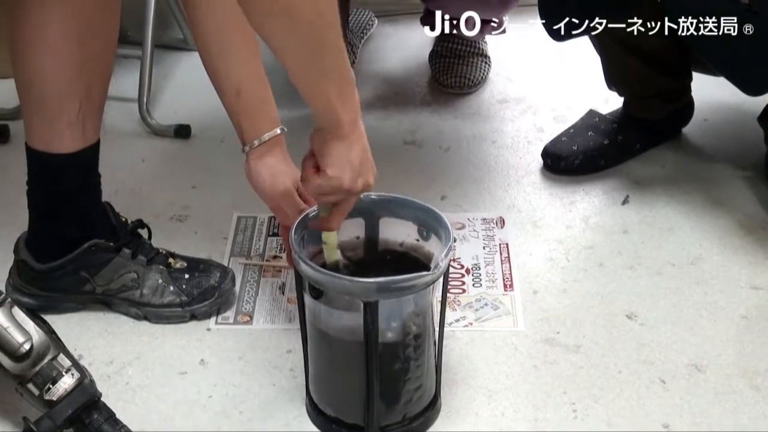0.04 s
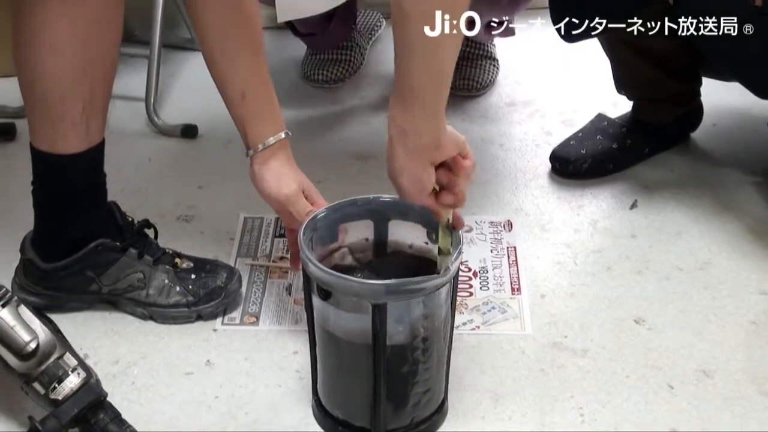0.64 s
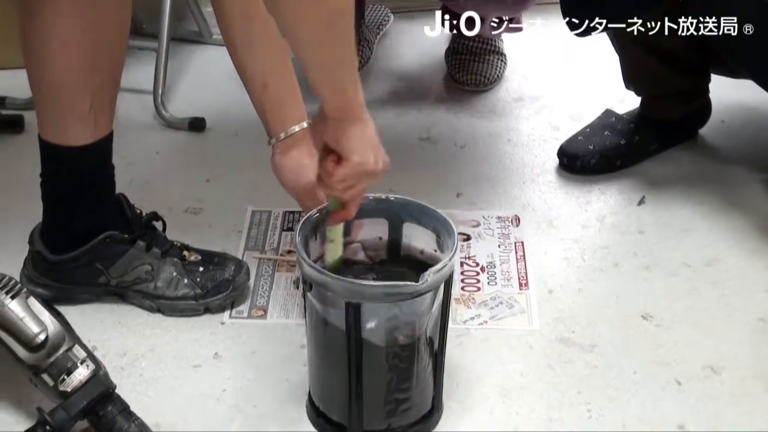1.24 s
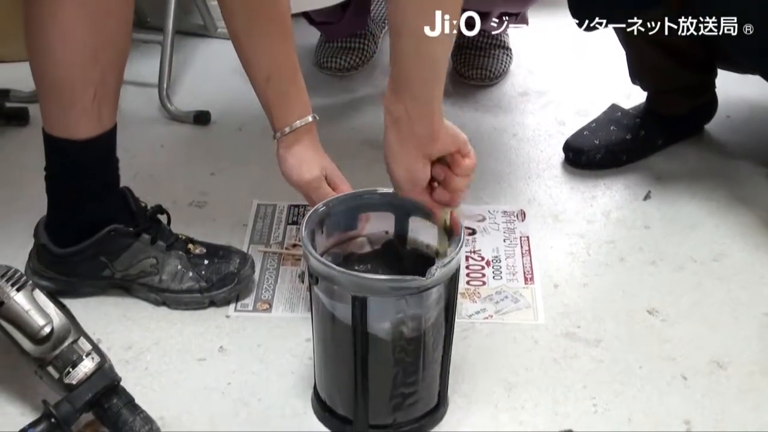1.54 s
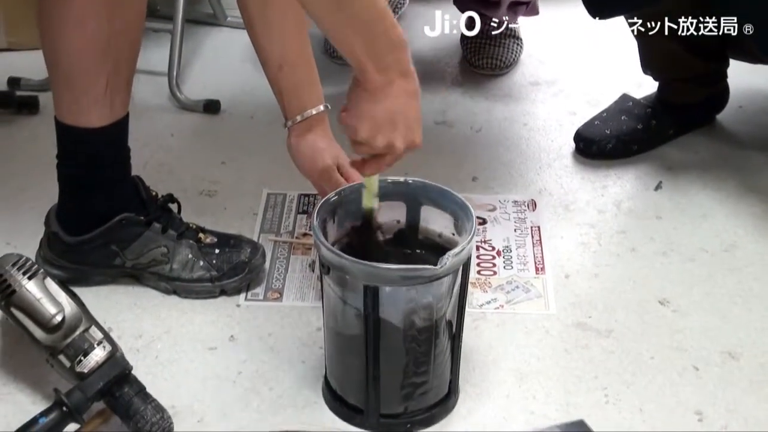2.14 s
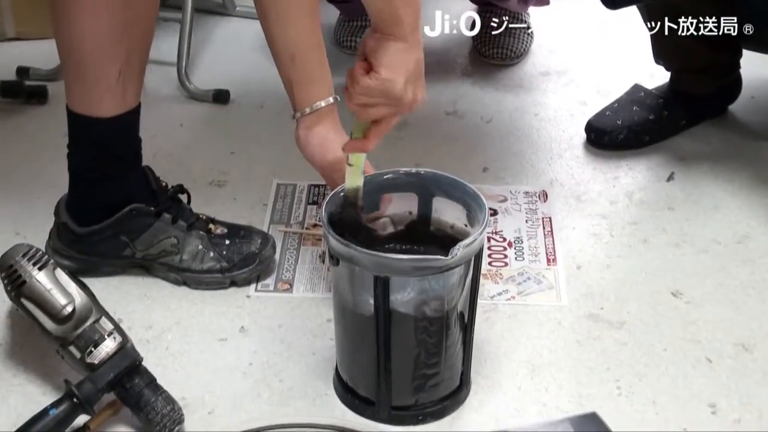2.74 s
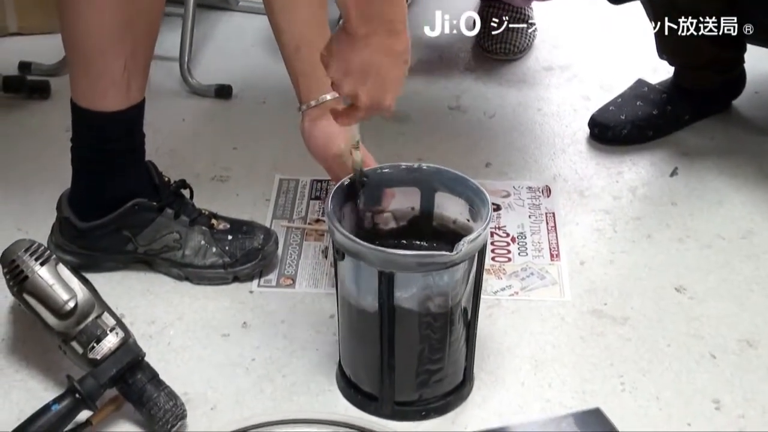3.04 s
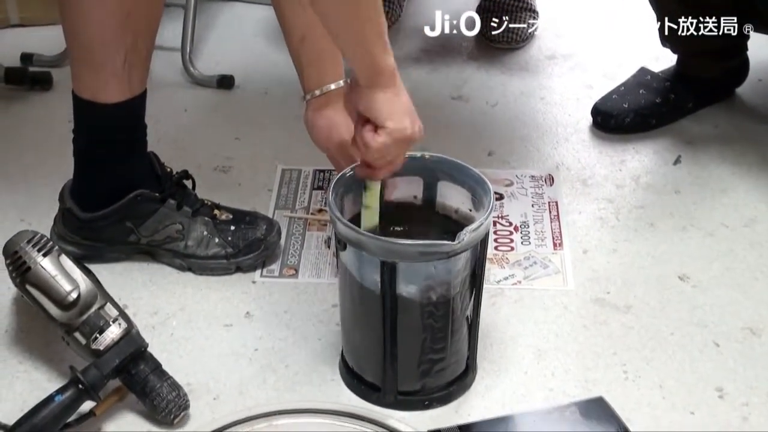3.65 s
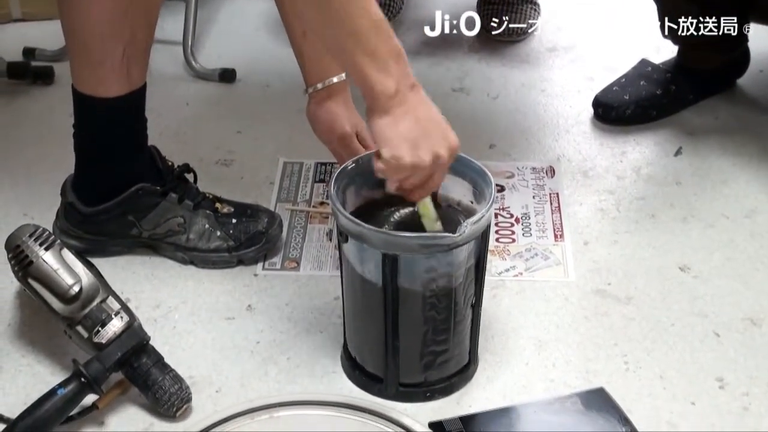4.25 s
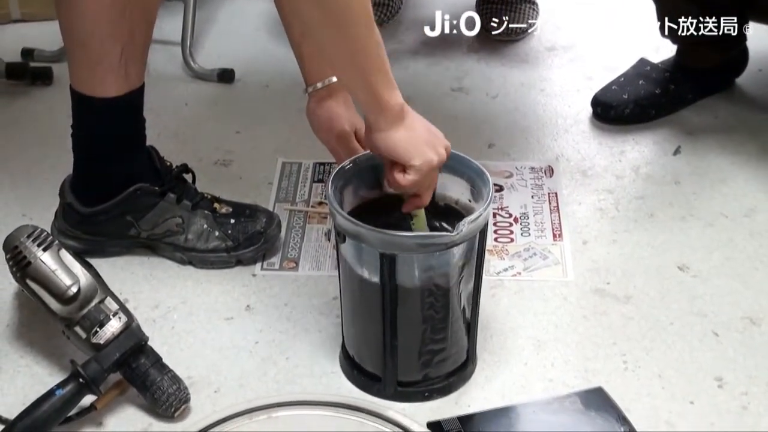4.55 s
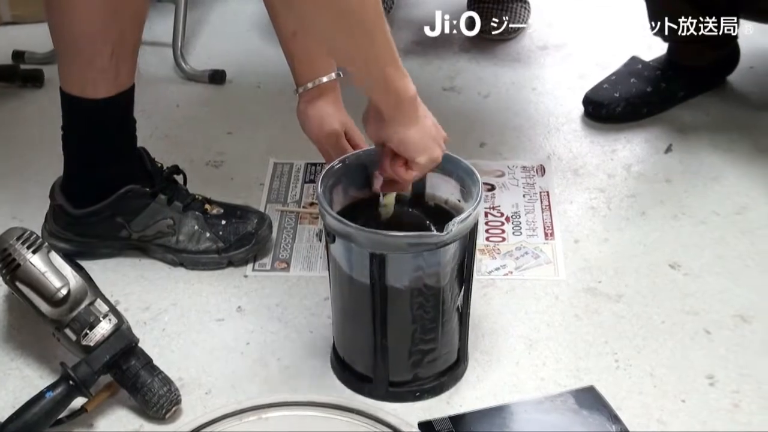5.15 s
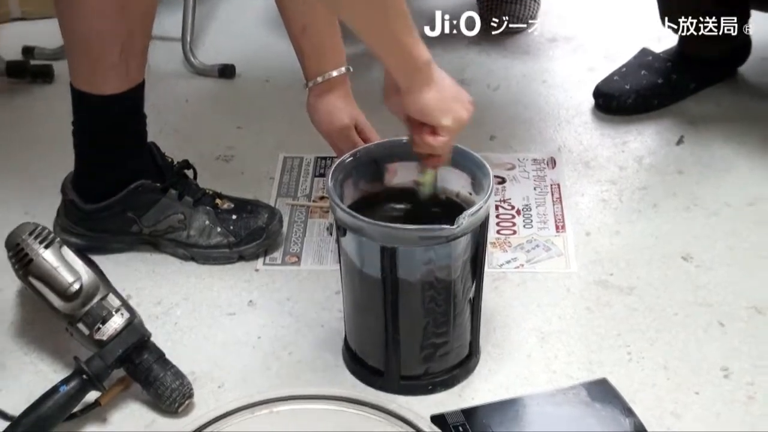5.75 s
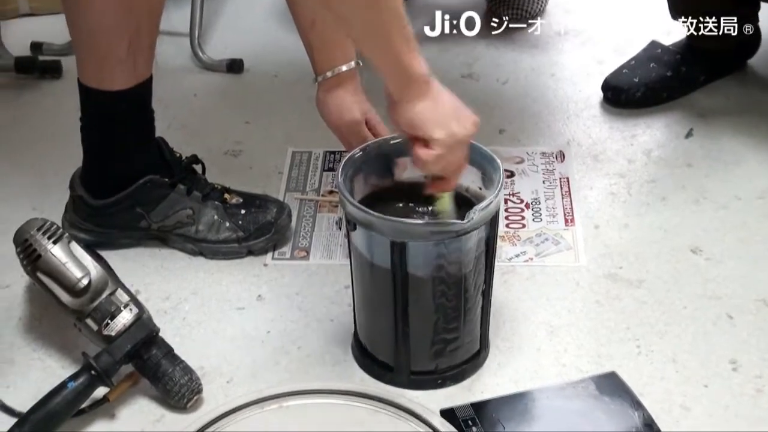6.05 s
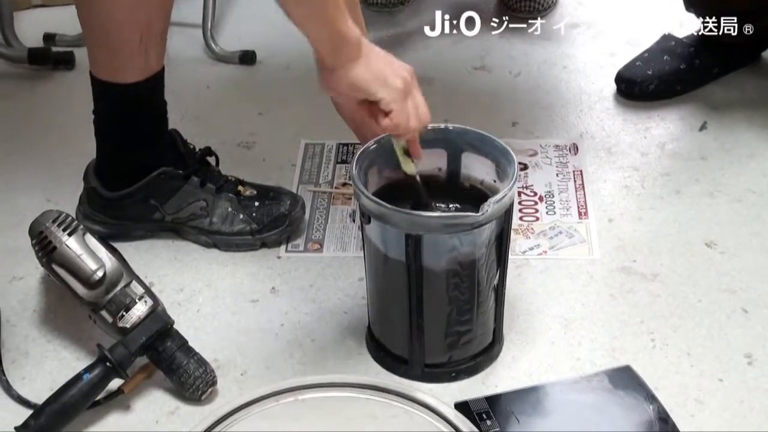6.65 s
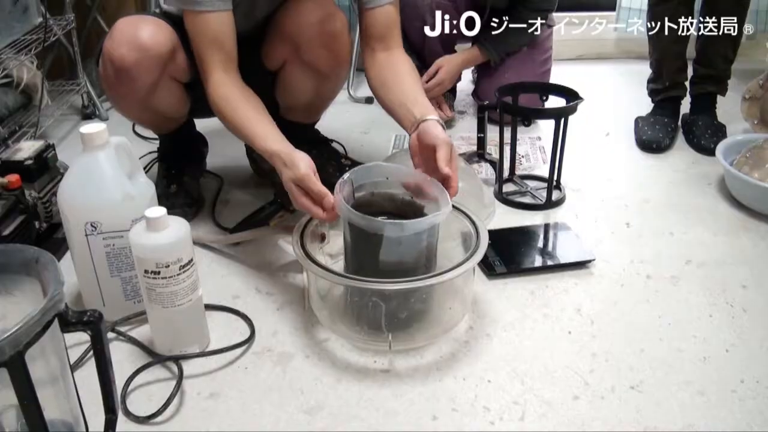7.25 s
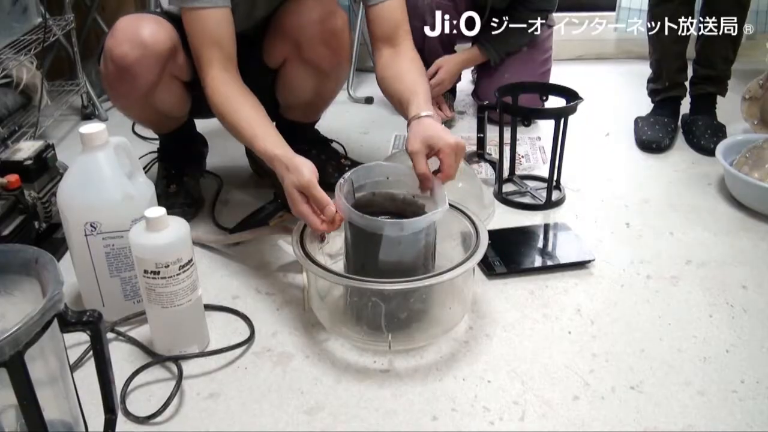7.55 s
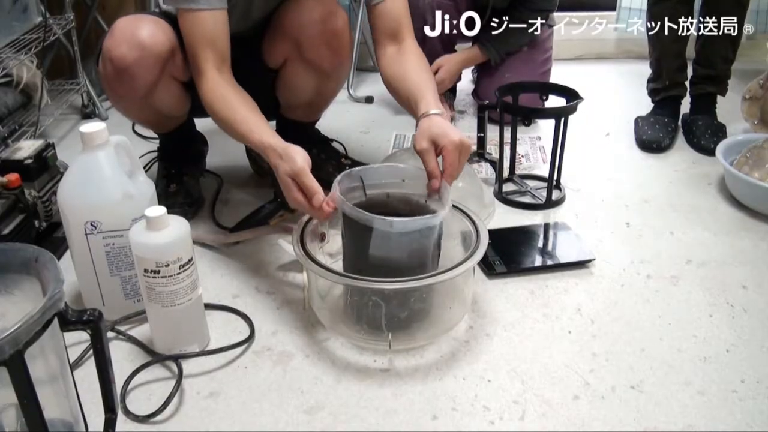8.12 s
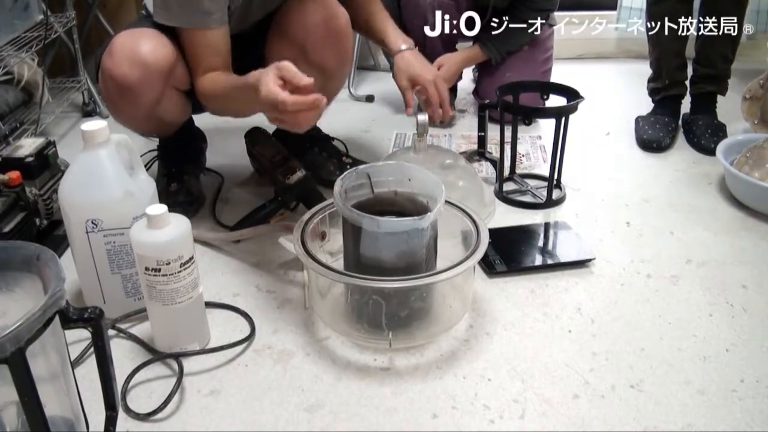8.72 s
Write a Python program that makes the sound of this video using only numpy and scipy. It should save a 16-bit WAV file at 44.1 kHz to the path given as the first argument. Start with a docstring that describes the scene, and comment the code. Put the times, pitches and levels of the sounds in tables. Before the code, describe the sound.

Dull knocks, sticky clicks and wet slurps of thick liquid being stirred, followed by a plastic tub rattling and rubbing against glass.

```python
"""A stick stirs thick silicone in a plastic bucket on a workshop floor: dull wall knocks, sticky snaps,
scrapes and a run of slurps as air is sucked in behind the stick. From 7 s, heard from further off,
the tub is lowered into a glass bowl, where it bumps, rattles and rubs.
Moving air rumbles on a nearly mono microphone."""
import sys
import numpy as np
from scipy import signal
from scipy.fft import rfft, irfft
from scipy.io import wavfile
from scipy.ndimage import uniform_filter1d

SR = 44100
rng = np.random.default_rng(int(sys.argv[2]) if len(sys.argv) > 2 else 0)


def unload_audio(sound):
    """Save the sound as a 16-bit wav file, at the path given as the first command line argument."""
    columns = np.transpose(np.atleast_2d(sound))
    # keep every value between -1 and 1, then stretch to whole-number steps
    steps = np.round(np.clip(columns, -1, 1) * 32767)
    wavfile.write(sys.argv[1], SR, steps.astype(np.int16))


N = 387198
TIME_S = np.arange(N) / SR
FAR_START_S = 7.004
NEAR = TIME_S < FAR_START_S


def amp(db):
    return 10 ** (np.asarray(db) / 20)


def unit_rms(x):
    return x / np.sqrt(np.mean(x ** 2) + 1e-20)


def unit_hit(x):
    """Scales to the energy of 5 ms at rms 1."""
    return x * np.sqrt(SR * .005 / (np.sum(x ** 2) + 1e-20))


def log_interp(points, hz):
    """Reads (freq_hz, value) points on a log-frequency axis."""
    freq_hz, value = np.transpose(points)
    return np.interp(np.log(hz + 1), np.log(freq_hz + 1), value)


def add(mix, start_s, sound):
    part = mix[max(round(start_s * SR), 0):][:len(sound)]
    part += sound[:len(part)]


def colour(x, points):
    """Filters by (freq_hz, gain_db) points."""
    gain = amp(log_interp(points, np.fft.rfftfreq(len(x), 1 / SR)))
    return irfft(rfft(x) * gain, len(x))


def noise(spectrum):
    return unit_rms(colour(rng.standard_normal(N), spectrum))


def resonate(x, hz, width_hz):
    """Unity-gain resonance; hz may glide."""
    carrier = np.exp(2j * np.pi * np.cumsum(hz * np.ones(len(x))) / SR)
    pole = np.exp(-np.pi * abs(width_hz) / SR)
    return 2 * (carrier * signal.lfilter([1 - pole], [1, -pole], x / carrier)).real


def grains(size, per_s, spread_db):
    """Random tiny clicks, a few of them large."""
    heights = amp(spread_db * np.minimum(rng.exponential(1, size), 4)) * rng.choice([-1, 1], size)
    return unit_rms(heights * (rng.random(size) < per_s / SR))


def crack(centre_hz, width_oct, t60_s):
    """Fast-dying noise burst in a hump around centre_hz."""
    t = np.arange(SR // 4) / SR
    detune = np.log2((np.fft.rfftfreq(len(t), 1 / SR) + 1) / centre_hz) / width_oct
    hiss = irfft(rfft(rng.standard_normal(len(t))) / (1 + detune ** 2) ** 1.25, len(t))
    return unit_hit(hiss * amp(-60 * t / max(t60_s, .003)) * (1 - np.exp(-t / .00094)))


def struck(hz, t60_s, rise_s):
    """Damped mode with a soft start."""
    t = np.arange(SR // 4) / SR
    return unit_hit(np.sin(2 * np.pi * hz * t) * amp(-60 * t / t60_s) * (1 - np.exp(-t / rise_s)))


def room(x, wet_db):
    """Direct sound, early reflections and a short tail that dies band by band."""
    # floor and furniture reflections: delay_s, gain
    echoes = [(.0029, 0.16), (0.011, -0.25), (0.015, 0.34), (0.0229, 0.19), (.0275, .2), (0.036, -0.28)]
    # tail decay: freq_hz, t60_s
    decay = [(150, 0.28), (600, 0.26), (1700, 0.32), (4500, 0.28), (11000, 0.23)]
    # tail colour: freq_hz, gain_db
    tail_eq = [(150, -3.5), (600, 1), (1700, -7), (4500, -6.5), (11000, -6.5)]
    hz, t, bands = signal.stft(rng.standard_normal(SR // 2), SR, nperseg=256)
    tail = signal.istft(bands * amp(-60 * t / log_interp(decay, hz)[:, None]), SR, nperseg=256)[1]
    tail *= np.clip(np.arange(len(tail)) / SR / .0034, 0, 1) ** 2
    response = amp(wet_db) * colour(tail / np.linalg.norm(tail), tail_eq)
    response[0] += 1
    early = np.zeros(len(response))
    for delay_s, gain in echoes:
        add(early, delay_s, np.array([gain]))
    response += colour(early, [(800, -1.5), (2500, -6), (9000, -8.5)])  # clutter scatters the treble
    return signal.fftconvolve(x, response)[:N]


def air():
    """Steady workshop noise, softer at the far position."""
    # room noise, near: freq_hz, density_db
    near_air = [(53, -20), (90, 3), (245, -5.5), (355, -1.5), (444, -9), (502, -0.5), (545, -8),
                (1120, -13), (1900, -17), (11100, -26), (12000, -28.5), (15600, -79), (22000, -120)]
    # room noise, far: freq_hz, density_db
    far_air = [(53, -28), (90, 4), (256, -5), (642, -8.5), (2380, -15.5), (3660, -18), (5980, -20.5),
               (11300, -27), (12000, -30), (15600, -62), (22000, -120)]
    return np.where(NEAR, amp(-50.5) * noise(near_air), amp(-56) * noise(far_air))


def draught():
    """Slow eddies on the microphone; gusts swell them and buffet it."""
    # gusts: start_s, rise_s, eddy_db, buffet_db
    gusts = [(5.42, .11, -14, -22), (6.62, .06, -38, -41), (6.912, .026, -17, -18)]
    # eddy spectrum: freq_hz, density_db
    eddy_spectrum = [(3, -25.5), (9, 5), (15, -2), (24, -1.5), (35, -14), (48, -21.5), (65, -26),
                     (110, -58), (200, -47.5), (500, -81)]
    # buffet spectrum: freq_hz, density_db
    buffet_spectrum = [(10, -32), (28, -17), (42, -2.5), (62, -0.5), (85, -10), (120, -29), (200, -40),
                       (500, -113)]
    near_db, far_db, surge_s = -28.5, -40, .025
    eddies, buffets, surge = np.zeros((3, N))
    for start_s, rise_s, eddy_db, buffet_db in gusts:
        age = np.maximum(TIME_S - start_s, 0) / rise_s
        speed = age * np.exp(1 - age)
        eddies += amp(eddy_db) * speed
        buffets += amp(buffet_db) * speed ** 2
    # a last swell in the rumble breaks off with a click as the sound turns distant
    add(surge, FAR_START_S - surge_s, .24 * np.linspace(0, 1, int(surge_s * SR)) ** 2)
    flow = noise(eddy_spectrum)
    near = (amp(near_db) + eddies) * flow + buffets * noise(buffet_spectrum) + surge
    return np.where(NEAR, near, amp(far_db) * flow)


def churn():
    """Soft pops in the stirred mass swell once per turn of the stick."""
    # pop spectrum: freq_hz, density_db
    spectrum = [(100, -30), (220, -1), (350, -2.5), (680, 7), (950, -3), (1500, 0), (3000, -5.5),
                (6000, -31), (12000, -8.5)]
    turn_s, hardest_s, level_db, swing_db = .82, .45, -57, 2.5
    pops = unit_rms(colour(grains(N, per_s=900, spread_db=2.5), spectrum))
    drag = np.cos(2 * np.pi * (TIME_S - hardest_s) / turn_s)
    return amp(level_db + swing_db * drag) * pops * NEAR


def slides():
    """Fine friction grain as the stick or the tub slides."""
    # strokes: start_s, length_s, mid_level_db, swell_db
    strokes = [(0.881, 0.16, -38, 13.5), (2.5, 0.45, -51, -0.5), (2.943, 0.21, -48, -3),
               (4.43, .22, -60, -2), (6.795, 0.25, -48, -0.5), (7.027, 0.17, -47.5, -16),
               (7.271, 0.22, -42.5, -8), (7.587, 0.16, -46.5, -1), (8.005, 0.31, -48.5, -7.5),
               (8.375, 0.085, -43, -2)]
    # friction spectrum: freq_hz, density_db
    spectrum = [(200, -21), (700, -5), (1500, -7), (2600, -2.5), (4200, -5.5), (6500, -12.5), (9000, -14.5),
                (12000, -14)]
    attack_s, release_s = .019, .034
    envelope = np.zeros(N)
    for start_s, length_s, mid_level_db, swell_db in strokes:
        t = np.arange(0, length_s, 1 / SR)
        contact = np.minimum(t / attack_s, 1) * np.minimum((length_s - t) / release_s, 1)
        add(envelope, start_s, contact * amp(mid_level_db + swell_db * (t / length_s - .5)))
    return envelope * unit_rms(colour(grains(N, per_s=7300, spread_db=5.5), spectrum))


def squeaks():
    """Stick-slip excites one resonance of the plastic."""
    # squeaks: start_s, length_s, level_db, pitch_hz
    events = [(0.756, 0.0077, -44, 2400), (1.125, 0.0085, -39.5, 1960), (1.126, 0.0077, -36, 3650),
              (1.868, 0.0085, -32.5, 1865), (3.022, .12, -60, 3150), (6.984, .015, -42, 1290),
              (7.063, 0.011, -37, 790), (7.106, .023, -43.5, 590), (7.657, 0.014, -39, 730),
              (7.698, .018, -47.5, 780), (8.023, 0.038, -47.5, 700), (8.139, .026, -42.5, 800),
              (8.206, 0.017, -47.5, 645), (8.416, .067, -44.5, 1480), (8.431, 0.0194, -52, 640),
              (8.448, 0.006, -28.5, 2280)]
    out = np.zeros(N)
    for start_s, length_s, level_db, pitch_hz in events:
        size, width_hz = int(length_s * SR), 180 + .19 * pitch_hz
        slips = grains(size, per_s=3200, spread_db=-2) * signal.windows.tukey(size, .5)
        ring = resonate(np.pad(slips, (0, size)), pitch_hz, width_hz)
        ring = resonate(ring, pitch_hz, 2 * width_hz)
        add(out, start_s, amp(level_db) * unit_rms(ring))
    return out


def rattle():
    """The tub chatters on the glass as it settles."""
    # chatter spectrum: freq_hz, density_db
    spectrum = [(150, -8), (300, 6), (700, 3.5), (1050, -16), (1800, 9), (2700, -11), (3400, -24),
                (4300, -2.5), (8000, -8), (12000, -23)]
    start_s, level_db, t60_s = 7.168, -24, .31
    out, t = np.zeros(N), np.arange(SR // 3) / SR
    contacts = unit_rms(colour(grains(len(t), per_s=2500, spread_db=2), spectrum))
    add(out, start_s, amp(level_db - 60 * t / t60_s) * contacts)
    return out


def bumps():
    """The tub rocks in the bowl: each contact cracks and rings nearby modes, damped by the hands."""
    # contacts: start_s, level_db, ring_centre_hz, t60_ratio, crack_rel_db, crack_hz
    contacts = [(7.1599, -26, 1800, 0.74, 2, 2400), (7.164, -17, 476, .95, -1.5, 1390),
                (7.1681, -18.5, 1800, 0.5, 1.5, 2670), (7.170, -24, 620, 0.4, -4, 900),
                (7.177, -24, 335, 0.7, -18, 1500), (7.204, -27.5, 260, 0.84, -17, 1200),
                (7.7541, -33, 200, 0.45, 7.5, 900), (7.7585, -22.5, 850, 0.35, -0.5, 2030),
                (7.789, -37.5, 680, .4, -8, 1800)]
    # modes of the filled tub in the bowl: freq_hz, gain_db, t60_s
    modes = [(228.3, -5, 0.25), (297, 2.5, 0.053), (357, 1.5, 0.16), (457, -6, 0.24), (524.6, 1.5, 0.18),
             (745, 11, 0.093), (790, -9, 0.038), (1193, 4, 0.066), (1750, 4, 0.063), (1790, 0, 0.045),
             (2240, 7, 0.046)]
    out, t = np.zeros(N), np.arange(SR // 4) / SR
    for start_s, level_db, ring_centre_hz, t60_ratio, crack_rel_db, crack_hz in contacts:
        ring = np.zeros(len(t))
        for hz, gain_db, t60_s in modes:
            drive = 1 / (1 + (np.log2(hz / ring_centre_hz) / .45) ** 2)
            ring += drive * amp(gain_db - 60 * t / (t60_s * t60_ratio)) * np.sin(2 * np.pi * hz * t)
        impact = amp(crack_rel_db) * crack(crack_hz, width_oct=1, t60_s=.017)
        add(out, start_s, amp(level_db) * (unit_hit(ring) + impact))
    return out


def snaps():
    """Silicone films burst and plastic clicks; smaller, brighter films die sooner."""
    # snaps: start_s, level_db, centre_hz
    events = [(0.201, -40, 1450), (.4724, -43.5, 1610), (0.7577, -42.5, 2470), (1.0057, -18.5, 5870),
              (1.1264, -26.5, 3200), (1.303, -41, 7000), (1.597, -42, 6000), (1.6332, -35.5, 1530),
              (1.833, -27.5, 5060), (1.8709, -30, 2500), (1.9582, -34.5, 4440), (2.4725, -32, 7300),
              (3.4718, -38.5, 5730), (3.5502, -40, 1550), (3.623, -31.5, 2330), (3.667, -33.5, 1600),
              (3.926, -43.5, 5800), (5.0804, -33, 3450), (5.1067, -31, 1550), (5.289, -29, 1590),
              (5.528, -31.5, 1800), (5.655, -33.5, 1476), (5.6723, -25.5, 1490), (7.0482, -34, 2520),
              (7.0728, -37.5, 2620), (7.1287, -35.5, 4450), (7.296, -32, 2200), (7.454, -35, 1850),
              (7.646, -40, 1720), (7.8297, -47, 3000), (7.9288, -37.5, 4440), (8.0473, -45, 2180),
              (8.141, -39, 1800), (8.209, -38, 1720), (8.644, -33, 2400)]
    out = np.zeros(N)
    for start_s, level_db, centre_hz in events:
        t60_s = .033 * (2000 / centre_hz) ** .34
        add(out, start_s, amp(level_db) * crack(centre_hz, width_oct=1.5, t60_s=t60_s))
    return out


def pocket(tear, hz, width_hz, whistle_gain):
    """An air pocket rings with the crackle and whistles unsteadily at its gliding pitch."""
    ring = unit_rms(resonate(resonate(tear, hz, width_hz), hz, width_hz=1000))
    waver = unit_rms(uniform_filter1d(rng.standard_normal(len(hz)), size=150))
    phase = 2 * np.pi * np.cumsum(hz * (1 + .025 * waver)) / SR
    whistle = unit_rms(np.sin(phase) * (1 + .3 * waver))
    return unit_rms(ring + whistle_gain * whistle)


def slurps():
    """Air tears in behind the stick: crackle rings a pocket and its neck, gliding as they deform."""
    # slurps: start_s, length_s, level_db, swell_db, from_hz, to_hz
    events = [(3.663, 0.0422, -31.5, -7, 1227, 1343), (5.116, 0.055, -28, 3.5, 654.5, 780),
              (5.286, 0.053, -29.5, 2.5, 847, 787), (5.537, .033, -31.5, -5, 714, 983),
              (5.681, .064, -30.5, 4, 540, 1515), (5.89, 0.042, -34, 4, 480, 887),
              (6.098, 0.03, -41, -15, 679, 850), (6.191, 0.016, -37.5, -9, 840, 1060)]
    fizz_spectrum = [(150, -21), (500, 6), (1100, 13.5), (2000, 12), (2500, 4.5), (3200, 10.5),
                     (5000, 1.5), (8000, 3.5), (12000, -2.5), (14000, -40)]
    pitch_arch, neck_open_hz = .169, 1090
    out = np.zeros(N)
    for start_s, length_s, level_db, swell_db, from_hz, to_hz in events:
        progress = np.linspace(0, 1, int(length_s * SR))
        glide_hz = from_hz + (to_hz - from_hz) * progress
        pocket_hz = glide_hz * (1 + pitch_arch * np.sin(np.pi * progress))
        neck_hz = 1514 * (pocket_hz / 900) ** .62
        whistle_gain = 1.3 * amp(1 + .8 * swell_db)
        tear = grains(len(progress), per_s=3500, spread_db=1.5)
        body = pocket(tear, pocket_hz, width_hz=130, whistle_gain=whistle_gain)
        neck = pocket(tear, neck_hz, width_hz=240, whistle_gain=whistle_gain * amp(-3))
        neck /= 1 + (pocket_hz / neck_open_hz) ** 10  # an open neck falls silent
        fizz = unit_rms(colour(tear, fizz_spectrum))
        slurp = unit_rms(body + amp(2.5) * neck) + amp(.5) * fizz
        envelope = amp(swell_db * progress) * signal.windows.tukey(len(progress), .2)
        add(out, start_s, amp(level_db) * unit_rms(slurp * envelope))
    return out


def knocks():
    """Each knock rings two silicone-damped modes of the bucket wall, with a low push and a tick."""
    # stick knocks and silicone gulps: start_s, level_db, pitch_hz, tick_rel_db
    events = [(.6345, -28, 620, -10), (.6355, -30, 960, -9.5), (1.006, -36.5, 660, -20),
              (1.1672, -26, 700, -15), (1.181, -29.5, 553, -9), (1.328, -31.5, 560, -18),
              (1.3955, -35.5, 680, -19), (1.598, -33.5, 320, 4.5), (1.599, -34, 700, -1),
              (1.833, -38, 710, -8), (1.871, -34, 525, -3), (1.933, -36, 300, -2.5),
              (1.946, -31.5, 590, -4.5), (1.969, -30, 405, -18), (2.161, -34, 310, -6),
              (2.162, -33.5, 625, -8), (2.187, -31, 535, -15), (2.469, -32, 590, -2.5),
              (2.475, -36.5, 330, -12), (2.963, -39, 720, -9), (3.622, -30.5, 665, -12),
              (3.667, -34.5, 640, -8), (3.679, -32, 354, -2), (3.841, -42, 714, -1), (4.076, -41, 706, -1),
              (4.604, -41, 323, -16), (4.958, -43.5, 780, 5.5), (5.048, -34, 306, -1),
              (6.159, -41, 348, 0.5), (6.25, -31, 556, -18)]
    t60_cycles, rise_s, overtone_ratio = 7.2, .0017, 1.52
    push = amp(-7) * struck(hz=269, t60_s=.011, rise_s=.0034)  # the whole mass gives
    out = np.zeros(N)
    for start_s, level_db, pitch_hz, tick_rel_db in events:
        overtone_hz = overtone_ratio * pitch_hz
        wall = struck(pitch_hz, t60_cycles / pitch_hz, rise_s)
        overtone = amp(-10.5) * struck(overtone_hz, t60_cycles / overtone_hz, rise_s)
        tick = amp(tick_rel_db) * crack(centre_hz=1120, width_oct=1.66, t60_s=.021)
        add(out, start_s, amp(level_db) * (wall + overtone + push + tick))
    return out


def scene():
    """The work heard near, then far; the channels differ only by faint rumble and hiss."""
    # dulling with distance: freq_hz, gain_db
    far_eq = [(200, 3.5), (2500, -2), (5000, -1), (8000, -3), (12000, -0.5)]
    # microphone response: freq_hz, gain_db
    mic_eq = [(100, -1), (3000, -2.5), (3700, -6.5), (4300, -2.5), (5100, -7), (6000, -2), (6800, -6),
              (7800, -1), (8900, -9.5), (9800, -5), (10600, -11), (11300, -4.5), (12000, -15)]
    work = knocks() + snaps() + slurps() + bumps() + rattle() + squeaks() + slides() + churn()
    near = room(work * NEAR, wet_db=1) * NEAR
    far = colour(room(work * ~NEAR, wet_db=-2), far_eq)
    mid = colour(near + far, mic_eq) + air() + draught()
    side = amp(-68.5) * noise([(30, 19.5), (150, 26.5), (500, 8.5), (1000, -22), (3500, -24),
                               (8000, -7.5), (11500, 4), (13000, -30)])
    return np.array([mid + side, mid - side])


def record(dry):
    """Steep low-pass band limit."""
    cutoff_hz = 11950
    lowpass = signal.firwin(301, cutoff_hz, window=("kaiser", 9), fs=SR)
    return signal.oaconvolve(dry, lowpass[None], "same")


dry = scene()
out = record(dry)
unload_audio(out)
```